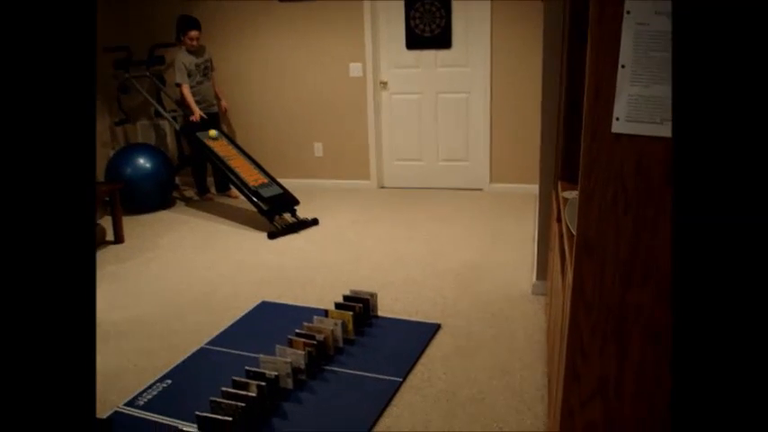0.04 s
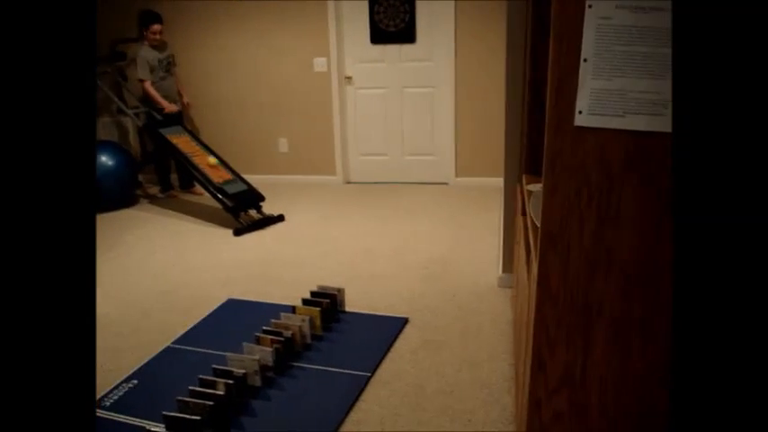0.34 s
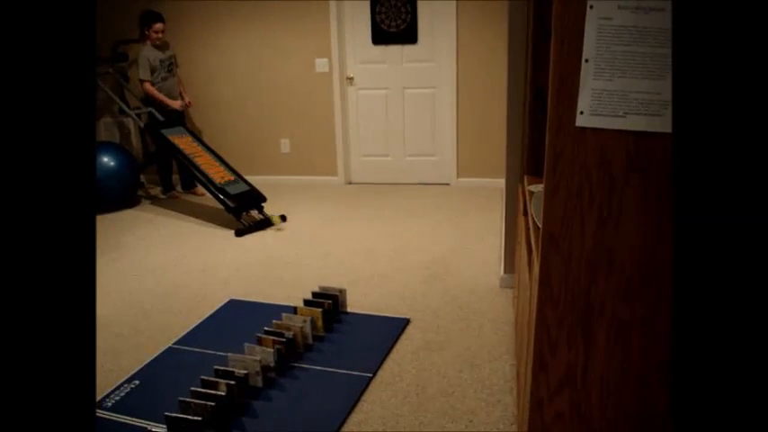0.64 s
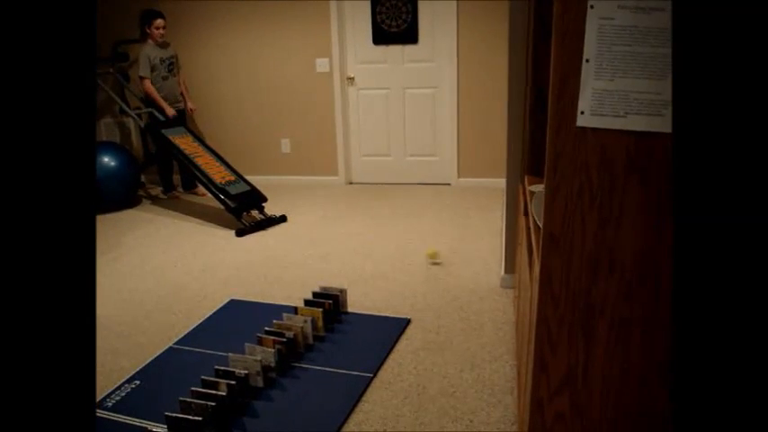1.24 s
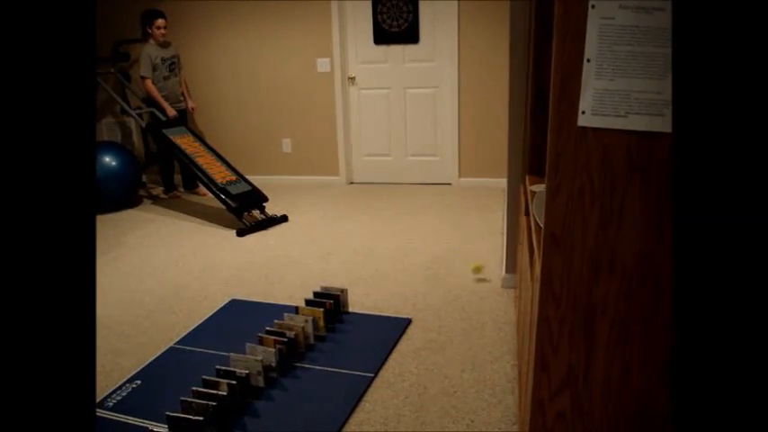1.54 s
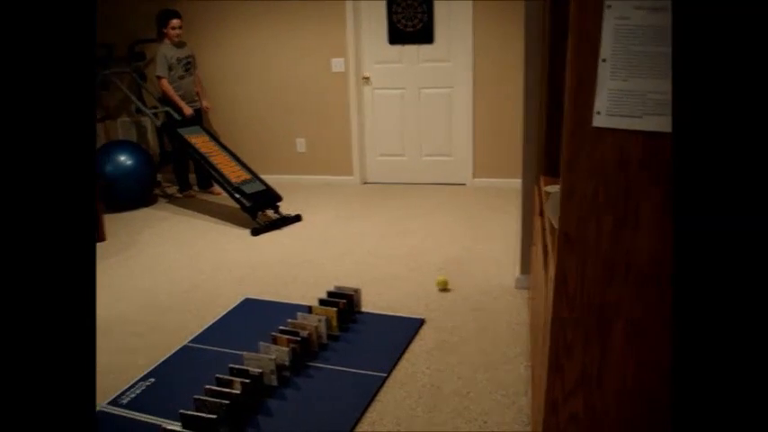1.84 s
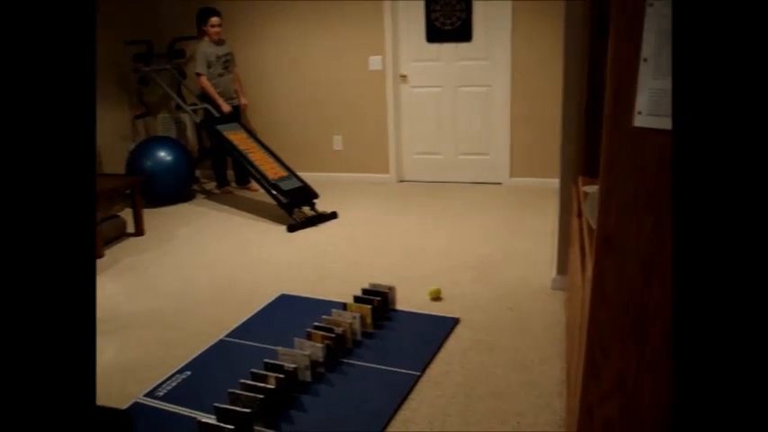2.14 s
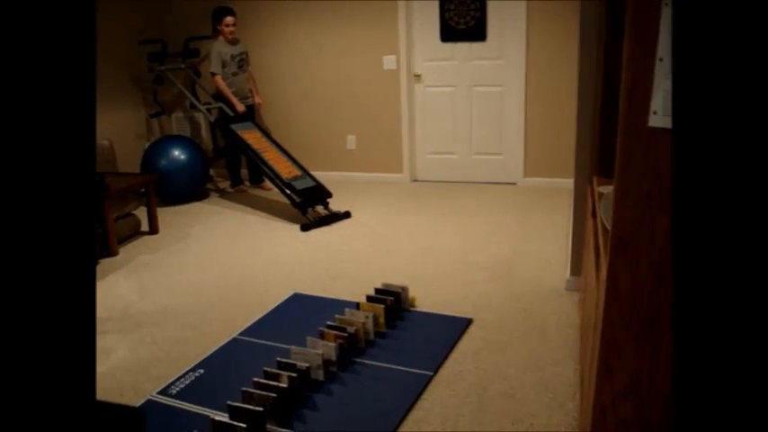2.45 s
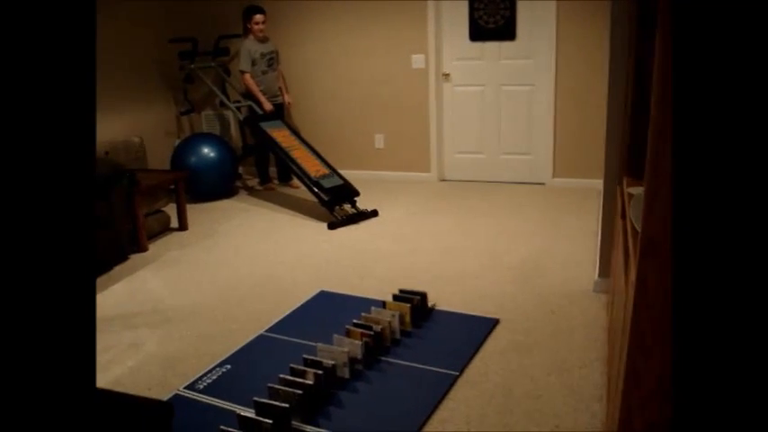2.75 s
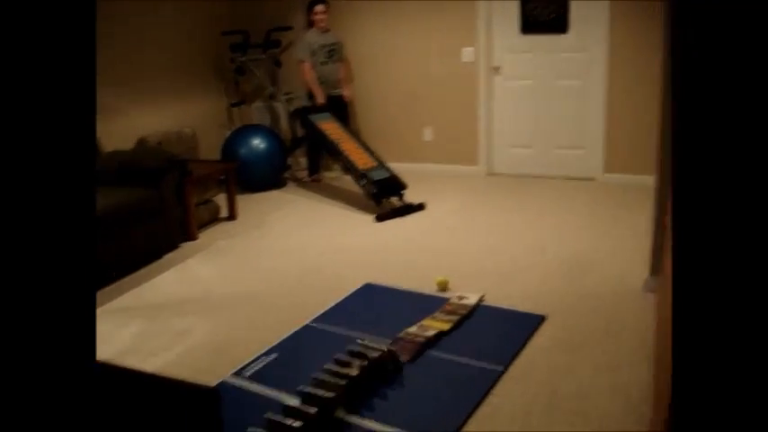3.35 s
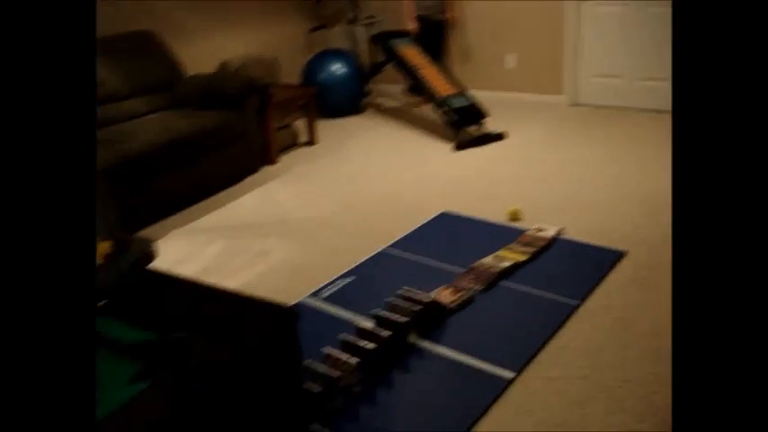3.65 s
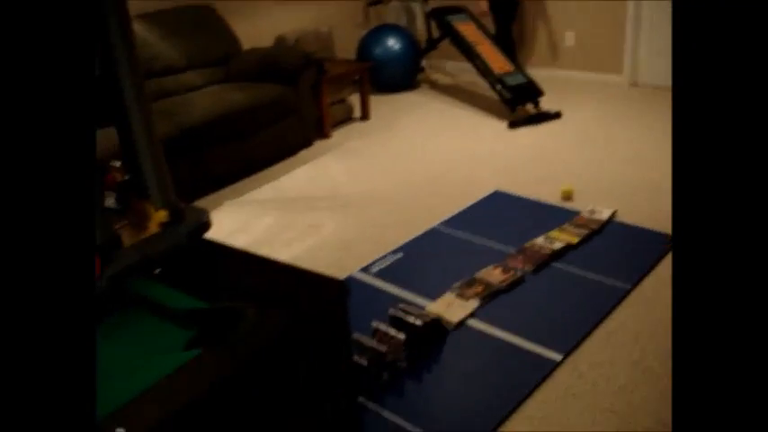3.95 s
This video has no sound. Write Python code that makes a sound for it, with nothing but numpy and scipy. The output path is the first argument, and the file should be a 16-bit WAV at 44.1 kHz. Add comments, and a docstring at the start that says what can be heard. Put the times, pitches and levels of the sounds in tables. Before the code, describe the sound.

Hollow blocks topple in a dense clatter after a ball bounces softly across carpet.

```python
"""Ball and toppling blocks

In a quiet room, well off the microphone, a ball rolls down a ramp, bounces over carpet, bumps the wall
and knocks on a low board. Closer in, it tips a row of hollow blocks, which topple into one another and
slap down on the board in a dense clatter. The microphone is small and hisses a little; the recorder's
limiter holds down the peaks and thumps under the loudest blows."""
import sys
import numpy as np
from scipy import signal
from scipy.fft import rfft, irfft
from scipy.io import wavfile
from scipy.ndimage import uniform_filter1d

SR = 44100
rng = np.random.default_rng(int(sys.argv[2]) if len(sys.argv) > 2 else 0)


def materialize(psi):
    """Save the field psi as 16-bit PCM at rate SR to the path in sys.argv[1].

    A 1-D psi becomes a single channel; in a 2-D psi each row is a channel.
    """
    bounded = np.clip(np.atleast_2d(psi).T, -1, 1)
    quanta = np.round(bounded * 32767).astype(np.int16)
    wavfile.write(sys.argv[1], SR, quanta)


N = 176400
TIME = np.arange(N) / SR
AGE = np.arange(SR // 2) / SR   # seconds since a blow
ROOM_DELAY_S, ECHO_SPAN_S = 0.006, 0.024


def from_db(db):
    """Decibels to gain."""
    return 10 ** (np.asarray(db) / 20)


def unit(x):
    """Scale to energy 1."""
    return x / np.sqrt(np.sum(x ** 2) + 1e-20)


def at_hz(points, hz):
    """Read a table on a log-frequency axis."""
    f, value = np.transpose(points)
    return np.interp(np.log(np.maximum(hz, 1)), np.log(f), value)


def envelope(points):
    """Gain over the scene from a table of times and levels."""
    s, db = np.transpose(points)
    return from_db(np.interp(TIME, s, db))


def dying(t60):
    """Exponential decay, 60 dB down after t60 seconds."""
    return np.exp(-np.log(1000) * AGE / t60)


def add(track, s, sound):
    """Mix a sound in at a time."""
    i = int(s * SR)
    track[i:i + len(sound)] += sound[:N - i]


def coloured(x, spectrum, size=8192):
    """Causal (minimum-phase) filter of energy 1 with the given spectrum."""
    gain = from_db(at_hz(spectrum, np.fft.rfftfreq(size, 1 / SR)))
    cepstrum = irfft(np.log(gain))
    cepstrum[1:size // 2] *= 2
    cepstrum[size // 2 + 1:] = 0
    response = unit(irfft(np.exp(rfft(cepstrum))))
    return signal.fftconvolve(x, response)[:len(x)]


def tilted(x, bright_db, pivot_hz=2550):
    """Tip the treble against the bass."""
    low = signal.sosfilt(signal.butter(1, pivot_hz, fs=SR, output="sos"), x)
    return low * from_db(-bright_db / 2) + (x - low) * from_db(bright_db / 2)


def resonance(x, hz, octaves):
    """Keep a band reaching this many octaves to each side of a pitch; energy 1."""
    band = signal.butter(2, [hz / 2 ** octaves, hz * 2 ** octaves], "band", fs=SR, output="sos")
    return unit(signal.sosfilt(band, x))


def burst(t60):
    """Many crowded modes dying together; energy 1."""
    return unit(rng.standard_normal(len(AGE)) * dying(t60))


def ring(hz, t60):
    """One struck mode; energy 1."""
    return unit(np.sin(2 * np.pi * hz * AGE) * dying(t60))


def struck(modes, spread):
    """A body's modes, with new strengths and slightly new pitches for each blow."""
    out = 0
    for hz, db, t60 in modes:
        strength = rng.choice([-1, 1]) * from_db(db + rng.normal(0, 3.94))
        out += strength * ring(hz * np.exp(spread * rng.normal()), t60)
    return out


# the room's reverberation: (frequency [Hz], t60 [s])
ROOM_DECAY = [(100, 0.25), (260, 0.83), (700, 0.28), (1800, 0.42), (4800, 0.11), (10000, 0.083)]


def room_tails(count=13):
    """Diffuse tails for several places in the room, dying octave by octave."""
    white, out = rng.standard_normal((2, count, len(AGE))), 0
    for k, low in enumerate(40 * 2 ** np.arange(9.)):
        band = signal.butter(2, [low, min(2 * low, SR / 3)], "band", fs=SR, output="sos")
        out += signal.sosfilt(band, white[k % 2]) * dying(at_hz(ROOM_DECAY, low * np.sqrt(2)))
    swell = 1 - np.exp(-(AGE / ROOM_DELAY_S) ** 2)
    return [unit(tail) for tail in out * swell]


def in_room(sound, tail, echo_db, wet_db, direct_db=0, count=10):
    """What reaches the microphone: the direct sound, a few early echoes and the diffuse tail."""
    echoes = np.zeros(len(AGE))
    delays = ROOM_DELAY_S + ECHO_SPAN_S * rng.random(count)
    echoes[(delays * SR).astype(int)] = rng.normal(size=count)
    room = from_db(echo_db) * unit(echoes) + from_db(wet_db) * tail
    return from_db(direct_db) * sound + signal.fftconvolve(sound, room)[:len(sound)]


def distant_blow(tail, t60, echo_db, wet_db, build_s):
    """A blow some way off: direct pulse, a swelling and dying cloud of echoes, the diffuse tail."""
    swell = 1 - np.exp(-(AGE / build_s) ** 2)
    echoes = unit(burst(t60) * swell)
    return unit(signal.unit_impulse(len(AGE)) + from_db(echo_db) * echoes + from_db(wet_db) * tail)


# the noise floor: (frequency [Hz], level [dB])
HISS_SPECTRUM = [(15, -60), (25, -29.5), (102, -10), (152, -11), (245, -3.5), (348, -11.5), (394, -11),
                 (546, -14), (701, -13), (1350, -19), (2460, -23), (7220, -28.5), (10000, -34),
                 (13000, -70), (22000, -120)]


def hiss():
    """The quiet room and the small microphone's own steady noise."""
    return from_db(-50.5) * coloured(rng.standard_normal(N), HISS_SPECTRUM)


# the run down the ramp: (time [s], level [dB])
ROLL_LEVEL = [(0, -62), (.3, -56), (.61, -52.5), (.66, -63), (.8, -100)]
# felt on the ramp: (frequency [Hz], level [dB])
ROLL_SPECTRUM = [(60, -6), (200, -1.5), (600, 6), (1300, -8.5), (3500, -4.5), (6000, -18.5), (10000, -37)]


def rolling():
    """The ball's felt rustles down the ramp, faint at this distance."""
    return envelope(ROLL_LEVEL) * coloured(rng.standard_normal(N), ROLL_SPECTRUM)


def ramp_tick(tail):
    """The ramp ticks once under the ball."""
    out = np.zeros(N)
    tick = in_room(ring(hz=3700, t60=0.0024), tail, echo_db=-12, wet_db=-8)
    add(out, 0.4935, from_db(-24.5) * tick)
    return out


# the ball lands on the carpet: (time [s], level [dB], brightness [dB])
BOUNCES = [(0.759, 8.5, 3), (1.06, 5, -5.5), (1.279, -5, -19), (1.419, -16, -13)]
# one bounce: (frequency [Hz], level [dB])
BOUNCE_SPECTRUM = [(60, -27), (130, -18), (230, -1.5), (350, 1), (490, 0), (650, -10), (900, -20),
                   (1400, -25.5), (2300, -31), (3500, -48), (9000, -61)]


def carpet_bounces(tails):
    """Soft bounces across the room, heard mostly as echoes between floor, ceiling and wall."""
    out = np.zeros(N)
    for (s, db, bright_db), tail in zip(BOUNCES, tails):
        blow = distant_blow(tail, t60=0.21, echo_db=7, wet_db=-8.5, build_s=0.0078)
        pop = tilted(coloured(blow, BOUNCE_SPECTRUM), bright_db, pivot_hz=800)
        add(out, s, from_db(db) * unit(pop))
    return out


# the bump on the wall: (frequency [Hz], level [dB])
WALL_SPECTRUM = [(50, -9), (110, 0), (190, 1.5), (300, -1.5), (500, 0), (1100, -4.5), (1600, -12),
                 (2500, -21), (4500, -28), (9000, -47)]
# the wall's boom: (frequency [Hz], level [dB], t60 [s])
WALL_MODES = [(201.3, 4.5, .25)]


def wall_bump(tail):
    """The ball sets the wall booming, so far off that the microphone gets mostly room."""
    out = np.zeros(N)
    blow = distant_blow(tail, t60=0.42, echo_db=14, wet_db=8, build_s=0.006)
    bump = unit(coloured(blow, WALL_SPECTRUM))
    boom = sum(from_db(db) * ring(hz, t60) for hz, db, t60 in WALL_MODES)
    swell = 1 - np.exp(-AGE / 0.0098)
    add(out, 1.5515, from_db(-3) * (bump + boom * swell))
    return out


# the ball meets the board's edge: (time [s], level [dB], brightness [dB])
EDGE_KNOCKS = [(2.524, -6, -8.5), (2.697, -23, 6)]
# one knock: (frequency [Hz], level [dB])
EDGE_SPECTRUM = [(80, -9), (250, -3), (600, -4.5), (820, -0.5), (1000, -8.5), (2000, -0.5), (2800, -6),
                 (3500, -4.5), (5500, -10.5), (9500, -23.5)]
# the wood's ring: (frequency [Hz], level [dB], t60 [s])
EDGE_MODES = [(833, -5.5, 0.16)]


def edge_knocks(tails):
    """The ball knocks on the board and touches it once more, with plenty of room around the sound."""
    out = np.zeros(N)
    for (s, db, bright_db), tail in zip(EDGE_KNOCKS, tails):
        blow = distant_blow(tail, t60=0.24, echo_db=14, wet_db=3.5, build_s=0.0015)
        knock = unit(tilted(coloured(blow, EDGE_SPECTRUM), bright_db))
        wood = sum(from_db(mode_db) * ring(hz, t60) for hz, mode_db, t60 in EDGE_MODES)
        add(out, s, from_db(db) * (knock + wood))
    return out


# a blow among the blocks: the first is the ball striking a block, the rest blocks striking a neighbour or the
# board: # (time [s], level [dB], main ring [Hz], ring level [dB], brightness [dB], direct sound [dB])
TOPPLES = [(2.7764, -8, 4240, -4, -5.5, -1), (2.8327, -16.5, 2110, 4, -17.5, 2),
           (2.867, -5, 4330, -4, 1, -4), (2.8674, -5, 4700, 1, -5, -0.5), (2.885, -26, 1840, 3, 9, -3),
           (2.9198, -11, 1530, -2, -1, 0.5), (2.9501, -10, 1380, 0, -6, 0),
           (2.9591, -7, 4030, -0.5, -4, 0.5), (2.9856, -10.5, 1080, 1.5, -11, 2.5),
           (3.029, -4.5, 810, -5, 2, -1), (3.043, -7, 4100, 2, -5.5, -3),
           (3.0499, 2.5, 2660, -2, 1.5, -0.5), (3.0666, -22, 2570, -5, 3, -1),
           (3.0754, -10, 2480, -5, -8, -4), (3.1034, 1, 1970, -6, 4, 0.5),
           (3.1151, -3.5, 4180, 1.5, 6, -0.5), (3.134, 4, 3485, -5.5, 1.5, -2.5),
           (3.1586, 0, 990, -8, 3.5, -2), (3.1794, -9, 1960, -4, 2, 0), (3.2009, -1, 1710, 0, 2, 0),
           (3.2182, 2.5, 2050, -6.5, 1.5, -2), (3.2292, -1, 5140, 1.5, 1.5, -4.5),
           (3.251, -2.5, 2230, -9.5, -5, 1.5), (3.2677, -6, 1670, 0, 3, 1),
           (3.2821, -6, 1000, 2.5, 4, -3.5), (3.3151, -5, 2220, -3, 2, 0),
           (3.3331, -3.5, 1680, -2, 1.5, 0.5), (3.3433, -3.5, 2110, -6, -1, -0.5),
           (3.3606, -2.5, 1850, -9, 3, -2.5), (3.3865, -3.5, 980, -2, 0.5, -1),
           (3.3938, -5, 1020, 1, -1, -3), (3.4134, -4.5, 1520, -4.5, 2, -5.5),
           (3.4612, -17.5, 2110, -5, 2.5, 4.5), (3.4977, -8, 1590, -1, -4, -5),
           (3.5147, -5.5, 1720, -1, -4.5, -2), (3.5418, -1.5, 4160, -2, -5, 2.5),
           (3.5656, -4.5, 1140, 2, -1.5, 0), (3.6574, -14, 2080, -2, -6, -2.5),
           (3.6717, -11.5, 3260, -5, -2, -2.5), (3.7245, -23, 1170, -1, -4, 2.5),
           (3.7706, -5.5, 2220, 0, 5, -2), (3.7785, -3, 1926, 1.5, -4, -2.5), (3.7986, -29, 1570, 4, -1, 1),
           (3.8295, -4, 2160, -0.5, 3, -2), (3.8407, -8.5, 2150, 0.5, -1, 0),
           (3.8507, -4, 2400, -3, 3.5, -4), (3.8674, -20, 2330, -5, -3, 7),
           (3.902, -6.5, 1730, 2, 9.5, -3.5), (3.9185, -3, 1950, -3, -0.5, -1.5),
           (3.9343, -6, 2030, -1.5, -9, -0.5), (3.9549, -21, 1650, -3, -5, 4),
           (3.9833, -8, 3770, -11, 8.5, -0.5)]
# a hollow block's modes: (frequency [Hz], level [dB], t60 [s])
BLOCK_MODES = [(578, -7.5, 0.051), (831, -1.5, 0.069), (1073, -4.5, 0.07), (1588, -5.5, 0.057),
               (2063, -0.5, 0.027), (2550, -4, 0.029), (3286, 0, 0.01), (4130, -6.5, 0.016),
               (4776, 1.5, 0.0091)]
# the board under the blocks: (frequency [Hz], level [dB], t60 [s])
BOARD_MODES = [(160.5, -26, 0.43), (231, -21, 0.32), (275.4, -21, 0.43), (319.4, -22.5, 0.63),
               (402, -26.5, 0.22), (507.3, -23.5, 0.25)]
# colour of the clatter at the microphone: (frequency [Hz], level [dB])
CLATTER_SPECTRUM = [(60, -18.5), (120, -22), (165, -7), (300, -8), (600, -3), (1000, 0), (2200, -1),
                    (3500, 2.5), (4900, 0.5), (5800, -2), (7500, -6), (10000, -19)]


def clatter(tails, rebounds=3, rebound_s=0.04, contact_s=0.00088):
    """Nearer the microphone, each blow cracks, rings block and board, and rebounds a few times."""
    out = np.zeros(N)
    for k, (s, db, ring_hz, ring_db, bright_db, direct_db) in enumerate(TOPPLES):
        shell = burst(t60=0.042)
        contact = from_db(-10.5) * burst(t60=0.0016)
        modes = from_db(-7) * unit(struck(BLOCK_MODES, spread=0.081))   # blocks differ in size
        main_ring = from_db(ring_db - 6) * ring(ring_hz, t60=0.014)
        blow = tilted(shell + contact + modes, bright_db) + main_ring
        blow *= 1 - np.exp(-AGE / contact_s)   # an edge takes a moment to land fully
        hits = signal.unit_impulse(len(AGE))
        delays = rebound_s * rng.uniform(0.1, 1, rebounds)
        hits[(delays * SR).astype(int)] = from_db(rng.normal(-23, 1, rebounds))
        block = signal.fftconvolve(blow, hits)[:len(AGE)]
        block = in_room(block, tails[k % len(tails)], echo_db=-11, wet_db=-6.5, direct_db=direct_db)
        board = struck(BOARD_MODES, spread=0.014)
        add(out, s, from_db(db + 16) * (block + board))
    return coloured(out, CLATTER_SPECTRUM)


# leaning blocks slide on each other: (time [s], level [dB])
SLIDING_LEVEL = [(2.761, -87), (2.79, -45), (2.93, -33), (3.02, -47), (3.12, -20), (3.28, -18), (3.48, -38),
                 (3.60, -22.5), (3.751, -55.5), (3.80, -26.5), (4.0, -28.5)]


def sliding(tail, contacts_per_s=500, scatter_db=6.5):
    """Many tiny contacts chatter as the blocks lean and settle."""
    clicks = (rng.random(N) < contacts_per_s / SR) * rng.choice([-1, 1], N)
    clicks = clicks * from_db(scatter_db * rng.standard_normal(N))
    clicks = unit(clicks) * np.sqrt(N) * envelope(SLIDING_LEVEL)
    chatter = in_room(clicks, tail, echo_db=-10, wet_db=-4)
    return from_db(-7) * coloured(tilted(chatter, bright_db=-10), CLATTER_SPECTRUM)


# corner meets corner: (time [s], level [dB], pitch [Hz])
CORNER_SNAPS = [(2.8330, 7, 4220), (2.8679, 6, 4800), (2.872, 8, 4670), (3.1060, 7, 4400),
                (3.2300, 6, 4600), (3.5148, 5, 4280), (3.5425, 1.5, 4530), (3.5470, 7, 4600)]


def corner_snaps(tails):
    """Hard corners give short, narrow cracks that reach the microphone almost dry."""
    out = np.zeros(N)
    for (s, db, hz), tail in zip(CORNER_SNAPS, tails):
        crack = signal.unit_impulse(len(AGE)) + from_db(1.5) * burst(t60=0.009)
        snap = resonance(crack + 1e-18, hz, octaves=0.1)   # the offset prevents underflow
        add(out, s, from_db(db) * in_room(snap, tail, echo_db=-18, wet_db=-19.5))
    return out


# a block falls on the board: (time [s], level [dB], pitch [Hz])
BOARD_THUDS = [(2.868, 4.5, 320), (2.955, -8, 600), (3.045, 3, 330), (3.112, 7, 477), (3.160, 7, 493),
               (3.182, 2.5, 180), (3.225, -4, 250), (3.390, -8, 423), (3.543, -3, 330), (3.840, -3, 520),
               (3.920, -18, 330)]


def board_thuds(tails):
    """The board gives a low thud under blocks that fall flat."""
    out = np.zeros(N)
    for (s, db, hz), tail in zip(BOARD_THUDS, tails):
        blow = distant_blow(tail, t60=0.25, echo_db=0, wet_db=-8, build_s=0.0035)
        add(out, s, from_db(db) * resonance(blow, hz, octaves=0.5))
    return out


# a block lands on its broad face: (time [s], level [dB], pitch [Hz])
HOLLOW_KNOCKS = [(2.962, -6, 1000), (2.987, -4, 1060), (3.545, 4, 1140), (3.566, 3, 1000)]


def hollow_knocks(tails):
    """The air inside a block resonates as it slaps down, and the knock carries round the room."""
    out = np.zeros(N)
    for (s, db, hz), tail in zip(HOLLOW_KNOCKS, tails):
        blow = distant_blow(tail, t60=0.24, echo_db=10, wet_db=-1, build_s=0.003)
        add(out, s, from_db(db) * resonance(blow, hz, octaves=0.27))
    return out


# the recorder's gain control feeds through: (time [s], level [dB])
LIMITER_THUMPS = [(3.115, -21.5), (3.155, -26), (3.226, -24), (3.340, -29), (3.391, -27.5), (3.541, -22.5),
                  (3.839, -33.5), (3.918, -30), (3.982, -20)]


def limiter_thumps(time_constant_s=0.0028):
    """Short, low, one-sided thumps from the recorder's limiter, placed under loud blows."""
    out, age = np.zeros(N), AGE / time_constant_s
    pulse = age ** 2 * np.exp(-age)
    for s, db in LIMITER_THUMPS:
        add(out, s, -from_db(db) * pulse / pulse.max())
    return signal.sosfilt(signal.butter(1, 3, "high", fs=SR, output="sos"), out)


def scene():
    """One microphone: the ball across the room, the blocks nearer, hiss and limiter thumps beneath."""
    tails = room_tails()
    floor = hiss()
    ball = rolling() + ramp_tick(tails[0])
    ball += carpet_bounces(tails) + wall_bump(tails[-1]) + edge_knocks(tails)
    blocks = clatter(tails) + sliding(tails[0]) + corner_snaps(tails)
    blocks += board_thuds(tails) + hollow_knocks(tails)
    return (floor + ball + blocks + limiter_thumps())[None]


def limiter(x, release_db_per_s=150):
    """The recorder turns itself down on peaks over full scale and recovers quickly."""
    over_db = np.maximum(20 * np.log10(np.abs(x) + 1e-9), 0)
    release_db = release_db_per_s * TIME
    held_db = np.maximum.accumulate(over_db + release_db, axis=-1) - release_db
    return x * from_db(-uniform_filter1d(held_db, size=44, axis=-1))   # smoothed over 1 ms


def record(dry):
    """The recorder holds down and rounds the peaks, then cuts the top treble steeply."""
    ceiling, cutoff_hz = 0.84, 10050
    rounded = ceiling * np.tanh(limiter(dry) / ceiling)
    return signal.sosfilt(signal.ellip(12, 0.2, 80, cutoff_hz, fs=SR, output="sos"), rounded)


dry = scene()
out = record(dry)
materialize(out)
```